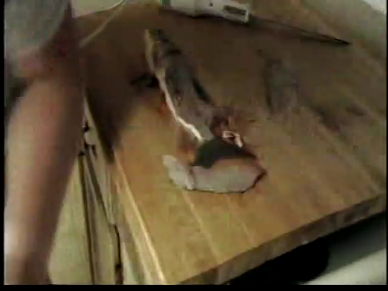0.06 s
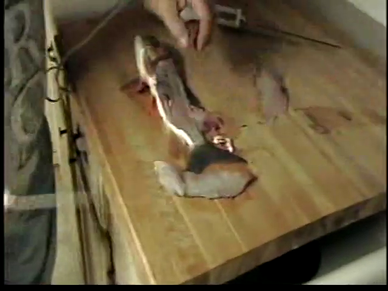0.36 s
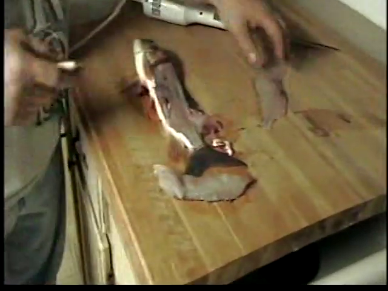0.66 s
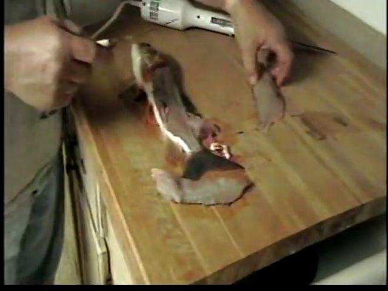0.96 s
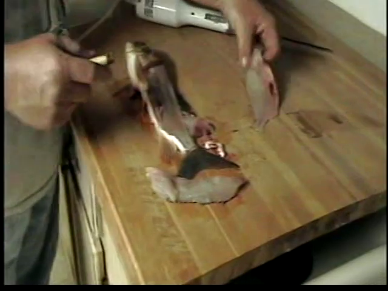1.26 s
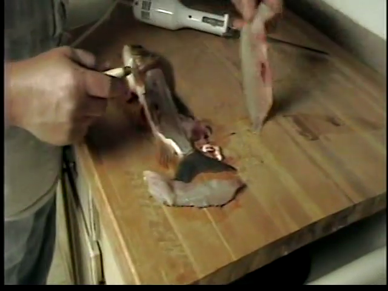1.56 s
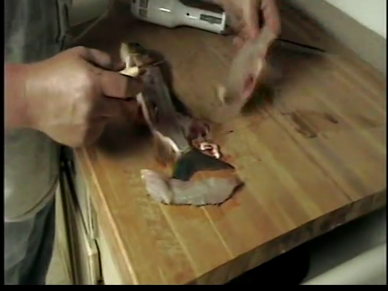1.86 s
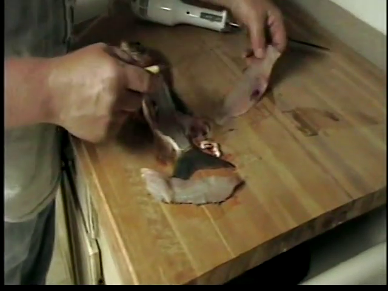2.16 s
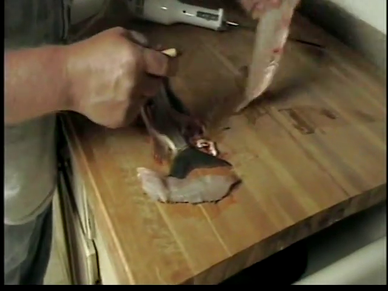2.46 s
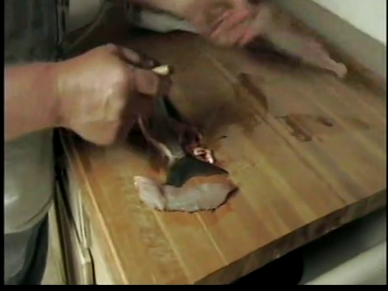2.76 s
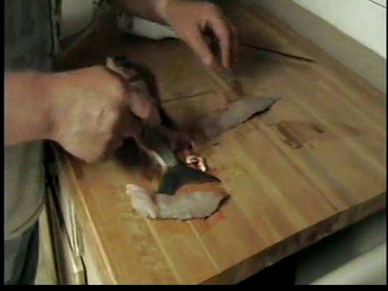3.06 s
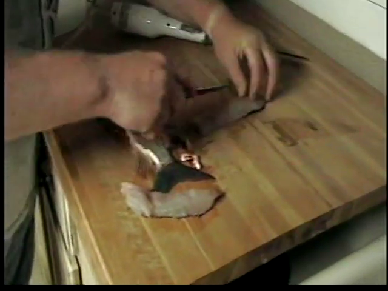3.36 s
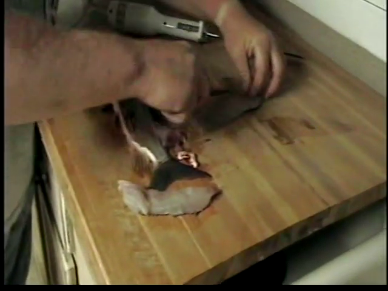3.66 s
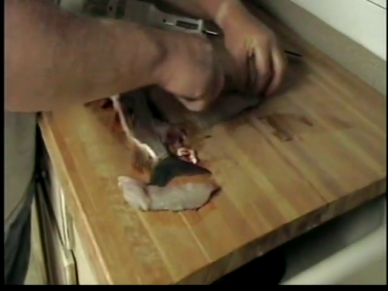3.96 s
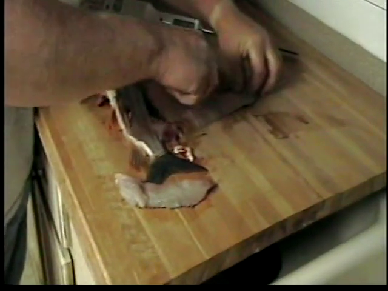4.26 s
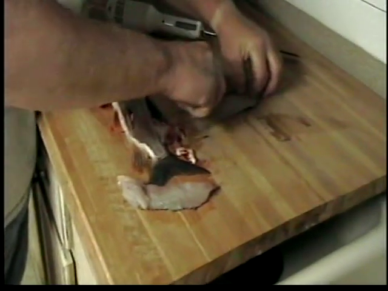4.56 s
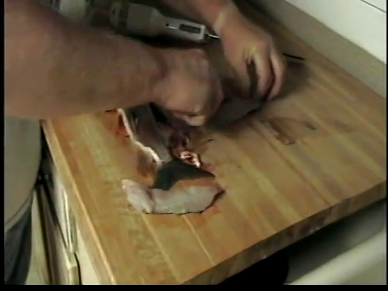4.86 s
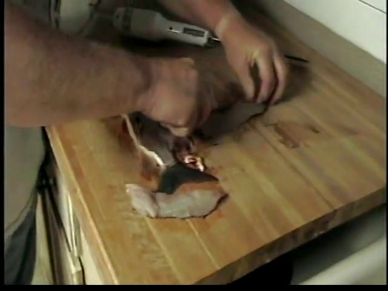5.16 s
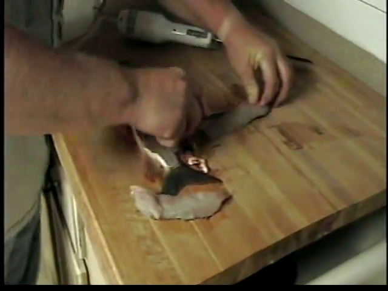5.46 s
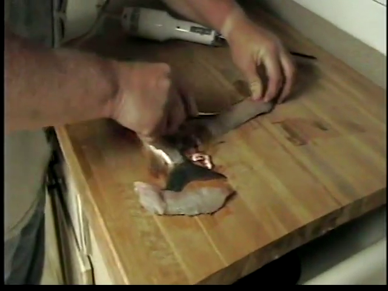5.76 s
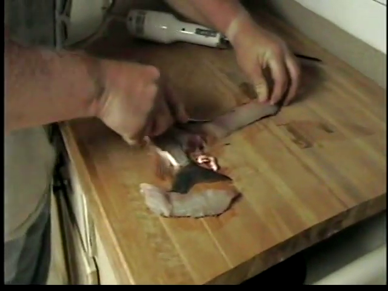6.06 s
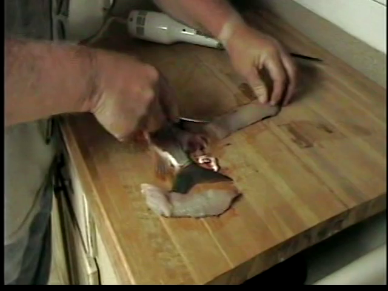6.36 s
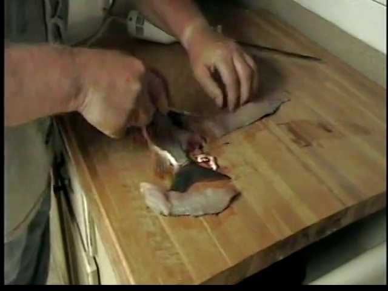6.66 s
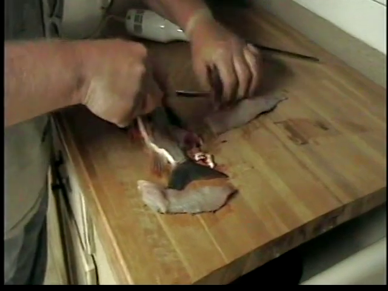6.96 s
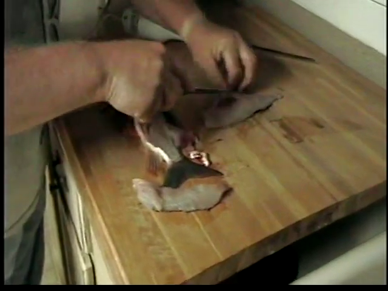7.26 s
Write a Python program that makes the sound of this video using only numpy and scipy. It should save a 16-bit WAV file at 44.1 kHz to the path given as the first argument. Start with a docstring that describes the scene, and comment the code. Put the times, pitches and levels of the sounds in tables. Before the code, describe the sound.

A fish is handled and cut on a wooden board, heard close up in a small room with a steady low appliance hum and soft hiss. In the first 0.4 seconds, wet flesh squelches with quick snaps and little popping air pockets. A sleeve swishes at 0.7 seconds, and a firm, dull knock on the board follows at 0.9, then small wet clicks. From about 1.4 to 1.9 seconds a fillet peels up with a fine, bright, sticky crackle. A wet snap and soft thud come at 2 seconds, then another brief crackle and faint brushing. At 3 seconds a sharp crack and a wet smack on the wood form the loudest moment. After light rustles, a knife saws through rib bones from 4.4 to 6.8 seconds in short, quiet, gritty strokes, with small cracks and muffled bumps. Two soft knocks fall around 7 seconds.

```python
"""A small room, where a fish is filleted on a wooden worktop. Wet flesh squelches and its air pockets pop,
a sleeve swishes by friction, and bones snap in bursts of tiny ruptures. A fillet peels off, thread by
sticky thread, and smacks down, ringing the board's modes. Then the knife saws through the ribs in short,
gritty stick-slip strokes. An appliance hums steadily behind it all, over a soft rumble and hiss."""
import sys
import numpy as np
from scipy import signal
from scipy.fft import rfft, irfft, next_fast_len
from scipy.io import wavfile
from scipy.ndimage import map_coordinates

SR = 44100
rng = np.random.default_rng(int(sys.argv[2]) if len(sys.argv) > 2 else 0)


def transcribe(signal):
    """Save signal, clipped to [-1, 1], as a 16-bit WAV file at the path in sys.argv[1]."""
    frames = np.atleast_2d(signal).T
    limited = np.clip(frames, -1, 1)
    pcm = np.round(limited * 32767).astype(np.int16)
    wavfile.write(sys.argv[1], SR, pcm)


N = 327663

# Spectrum of one grain of tearing tissue. Each row: frequency in Hz, spectral level in dB.
GRIT_SPECTRUM = [(100, -30), (240, -6), (320, 7), (430, -20.5), (800, -0.5), (1400, -7), (2500, -4.5),
                 (3400, -1.5), (4300, -2.5), (5200, -0.5), (6300, -7), (7600, -10.5), (9300, -4.5),
                 (10600, -6.5), (13000, -3), (15800, -15.5)]


def snaps():
    """Fracture: bone and flesh start to give, break, spatter with smaller ruptures and pop an air pocket."""
    # Each row: time in seconds, level in dB, tilt in dB per octave, pocket pitch in Hz.
    fractures = [(.086, -21, 1, 4770), (0.0911, -23.5, -1, 1340), (0.154, -29.5, -9.5, 3920),
                 (.191, -28, 6, 12500), (.288, -29.5, -15.5, 1960), (.339, -28, -7, 3460),
                 (0.3577, -23, -1.5, 3700), (.982, -36.5, -21, 2630), (1.0416, -39, -10, 5600),
                 (1.081, -35.5, -6, 2550), (2.026, -19.5, -2, 2690), (2.0604, -29, 5, 8880),
                 (2.322, -34, 4, 9050), (2.9926, -13.5, -2.5, 3030), (4.429, -30.5, -4.5, 4440),
                 (4.6424, -31, 4.5, 9500), (4.8618, -37.5, 1.5, 9500), (4.9859, -32, -1.5, 4740),
                 (5.0425, -32, -1, 5340), (5.1976, -34.5, -4, 3320), (5.3803, -40, -2, 4000),
                 (6.6, -33.5, -3.5, 4600), (6.7947, -39.5, 3, 9500), (7.1033, -46, -4, 5000)]
    # One rupture. Each row: frequency in Hz, spectral level in dB.
    spectrum = [(150, -17), (600, -8.5), (1400, -2.5), (2200, 0.5), (3000, 0), (4500, 7.5), (6000, 4.5),
                (7400, 0.5), (9500, 3), (12000, 0.5), (15800, 4)]
    break_s, pocket_db = .001, 3
    out, t = np.zeros((2, N)), np.arange(-SR // 200, SR // 20) / SR
    for s, db, tilt_db, pocket_hz in fractures:
        giving = np.exp(np.minimum(t - break_s, 0) / 0.0011)  # the tear accelerates up to the break
        decay = amp(-60 * np.abs(t) / 0.025) + amp(8 - 60 * np.abs(t) / 0.051)
        burst = grains(len(t), rate=17000, spread_db=5.5) * giving * decay
        burst *= 2.69 / np.linalg.norm(burst)
        burst[np.searchsorted(t, break_s)] += 1
        crack = np.convolve(burst, ping(spectrum, tilt_db))[:len(t)]
        pop = amp(pocket_db) * pocket(t, pocket_hz)
        radiate(out, s + t[0], amp(db) * (crack + pop), wet_db=-4.5)
    return out


def knocks():
    """Impact excites the board's modes: soft contact mutes the high ones, hard contact ticks and smacks."""
    # Each row: start in seconds, level in dB, contact cut-off in Hz.
    blows = [(0.9128, -10, 790), (2.027, -24.5, 258), (2.994, -15, 423), (3.033, -10, 2300),
             (4.436, -27, 394.3), (5.003, -27, 400), (6.602, -28.5, 670), (6.978, -28, 348),
             (7.059, -33, 398)]
    # Each row: frequency in Hz, bandwidth in Hz, weight in dB.
    board_modes = [(84, 14, -13), (190, 6.8, -4.5), (225, 15, 2), (316, 8, 9.5), (517, 52, 1.5),
                   (635, 130, -19), (850, 150, 11), (954, 55, 10), (1198, 89, 7), (1670, 340, -25),
                   (2300, 330, -30)]
    # Wet flesh landing flat, and a hard contact. Each row: frequency in Hz, spectral level in dB.
    smack_spectrum = [(300, -30), (650, -23), (860, 6), (1170, 6.5), (1450, -6), (2400, -20), (6000, -32),
                      (15800, -38)]
    tick_spectrum = [(300, -51), (1200, -2), (2000, 10), (3800, 5), (5500, -11), (10000, -4.5),
                     (15800, -41)]
    hard_hz, smack_db = 2325, 1.5
    out, t = np.zeros((2, N)), np.arange(SR // 3) / SR
    for s, db, contact_hz in blows:
        ring = sum(amp(level + rng.normal(0, 1)) * width / (1 + (hz / contact_hz) ** 3) * mode(t, hz, width)
                   for hz, width, level in board_modes)
        radiate(out, s, -amp(db) * unit_energy(ring), wet_db=-1.5)
        tick_db = db + 2.5 + 32 * np.log2(contact_hz / hard_hz)  # softer contacts lose tick and smack
        contact = amp(smack_db) * signal.fftconvolve(spatter(t, t60=0.066), ping(smack_spectrum, tilt_db=-4))
        tick = ping(tick_spectrum, tilt_db=0)
        contact[:len(tick)] -= tick
        radiate(out, s, amp(tick_db) * contact, wet_db=-5)
    return out


def knife_strokes():
    """Stick-slip: the edge catches and tears fibre and bone in clumps of grains that ring the blade."""
    # Each row: time of the peak in seconds, length in seconds, level in dB.
    strokes = [(4.43, 0.061, -45), (4.559, 0.19, -62.5), (4.658, 0.12, -63), (4.789, 0.21, -63.5),
               (5.009, 0.13, -49.5), (5.194, 0.36, -64.5), (5.431, 0.16, -60.5), (5.629, 0.15, -58),
               (5.832, 0.1, -59), (6.034, 0.14, -59), (6.239, 0.13, -56), (6.607, 0.037, -52.5),
               (6.651, 0.12, -62), (6.774, 0.061, -56)]
    # Each row: frequency in Hz, bandwidth in Hz, weight in dB.
    blade_modes = [(3320, 230, -4.5), (5290, 580, 3), (9100, 680, -5.5), (13200, 770, -0.5)]
    out, t = np.zeros((2, N)), np.arange(SR // 50) / SR
    blade = sum(amp(level) * np.sqrt(width) * mode(t, hz, width) for hz, width, level in blade_modes)
    blade = amp(-5.5) * unit_energy(blade)  # relative to the tearing
    for s, length, db in strokes:
        start, force = swell(s, length, rise_share=0.51, shape=1.16)
        n = len(force)
        catching = amp(2.3 * wobble(130)[:n])
        tearing = force * unit_rms(catching * grains(n, rate=5000, spread_db=.5))
        jolts = force * unit_rms(catching * grains(n, rate=1600, spread_db=-1.0))
        grit = signal.fftconvolve(tearing, ping(GRIT_SPECTRUM, tilt_db=-0.5))[:n]
        ring = signal.fftconvolve(jolts, blade)[:n]
        radiate(out, start, amp(db) * (grit + ring), wet_db=-6.5)
    return out


def peels():
    """Adhesive failure: sticky threads part one by one in tiny bright crackles as the fillet lifts."""
    # Each row: time of the peak in seconds, length in seconds, level in dB.
    pulls = [(1.664, 0.56, -35.5), (2.408, 0.079, -29)]
    threads_per_s, thread_hz = 40, 10500
    gap = SR / threads_per_s
    out, t = np.zeros((2, N)), np.arange(SR // 40) / SR
    for s, length, db in pulls:
        start, pull = swell(s, length, rise_share=0.66, shape=1.4)
        crackles = np.zeros(len(pull) + len(t))
        for slot in np.arange(0, len(pull) - gap, gap):
            i = int(slot + gap * rng.random())
            hz = thread_hz * np.exp(.22 * rng.standard_normal())
            thread = signal.fftconvolve(spatter(t, t60=.025), pocket(t, hz, cycles=0.89))[:len(t)]
            crackles[i:i + len(t)] += pull[i] * amp(rng.normal(0, 2)) * thread
        radiate(out, start, amp(db) * crackles, wet_db=-4.5)
    return out


def squelches():
    """Yielding under pressure: flesh gives at once and oozes in fine grains as air pockets pop at random."""
    # Each row: time of the peak in seconds, release in seconds, level in dB, tilt in dB per octave.
    presses = [(.09, 0.15, -44.5, 1.5), (0.306, .13, -47.5, -8), (.36, 0.14, -52.5, -14),
               (1.084, 0.11, -57.5, -5), (1.304, 0.063, -54.5, 0), (2.03, .035, -49, -2.5),
               (2.998, 0.032, -34.5, 3)]
    attack_s = 0.0078
    pops_per_s, pop_hz, pop_db, fade_db = 40, 2616, 19.5, 15
    out = np.zeros((2, N))
    for s, release, db, tilt_db in presses:
        length = attack_s + release
        start, pressure = swell(s, length, rise_share=attack_s / length, shape=.85)
        t = start - s + np.arange(len(pressure)) / SR
        ruptures = pressure * grains(len(t), rate=8300, spread_db=6.0)
        ooze = signal.fftconvolve(ruptures, ping(GRIT_SPECTRUM, tilt_db))[:len(t)]
        for slot in np.arange(0, release, 1 / pops_per_s):
            delay = slot + rng.random() / pops_per_s
            hz = pop_hz * np.exp(0.37 * rng.standard_normal())
            ooze += amp(pop_db - fade_db * delay / release) * pocket(t - min(delay, t[-1] / 2), hz)
        radiate(out, start, amp(db) * ooze, wet_db=-4.0)
    return out


def plops():
    """Lightly damped resonance: larger air pockets open in the flesh and ring more clearly."""
    # Each row: start in seconds, pitch in Hz, level in dB.
    openings = [(.112, 2280, -18), (.132, 2140, -22), (0.158, 1920, -22.5), (.177, 4900, -26),
                (.233, 2750, -25)]
    out, t = np.zeros((2, N)), np.arange(SR // 25) / SR
    for s, hz, db in openings:
        radiate(out, s, amp(db) * pocket(t, hz, cycles=6), wet_db=-2)
    return out


def swishes():
    """Sliding friction: cloth and hands brush along in dense, even grains."""
    # Each row: time of the peak in seconds, length in seconds, level in dB, tilt in dB per octave.
    brushes = [(0, 0.059, -54, 2.5), (0.682, 0.24, -41, 3), (0.832, 0.61, -59, 14), (2.48, .4, -67, 2),
               (2.691, 0.19, -57.5, -4), (2.814, 0.13, -64, 2.5), (3.704, 0.09, -64, 4),
               (3.907, 0.034, -61, 3), (4.083, 0.04, -61, 1), (4.179, 0.022, -56.5, -2)]
    # Each row: frequency in Hz, spectral level in dB.
    cloth_spectrum = [(40, -26), (80, 5), (280, 13.5), (420, 6.5), (750, 15), (1300, 11), (2200, 10.5),
                      (3700, 5), (5100, 1.5), (5900, -6), (7500, -17), (12500, -21), (15800, -30.5)]
    out = np.zeros((2, N))
    for s, length, db, tilt_db in brushes:
        start, speed = swell(s, length, rise_share=0.43, shape=1.65)
        rubbing = speed * grains(len(speed), rate=4500, spread_db=1)
        swish = signal.fftconvolve(rubbing, ping(cloth_spectrum, tilt_db, hinge_hz=1250))
        radiate(out, start, amp(db) * swish, wet_db=-2.0)
    return out


def appliance_hum():
    """Superposed tones: steady mains harmonics, slightly unsteady motor tones and a drone that fades."""
    # Each row: multiple of the mains frequency, level in dB.
    harmonics = [(1, -59), (2, -64), (3, -71.5), (4, -76.5)]
    # Each row: frequency in Hz, level in dB.
    motor_tones = [(43.5, -76), (52, -84), (100.7, -63), (130.5, -81), (156, -71.5), (201, -74.5),
                   (730, -92), (1096, -76.5), (1460, -83.5), (2192, -77)]
    # Each row: time in seconds, frequency in Hz, level in dB.
    drone_path = [(0, 290, -68), (.5, 285.5, -68.5), (.95, 268.4, -67), (1.301, 271.7, -67),
                  (1.7, 284, -66), (2.1, 289, -67.5), (2.35, 290, -104)]
    mains_hz, t = 60, np.arange(N) / SR
    mains = sum(amp(db) * np.sin(2 * np.pi * (round(k) * mains_hz * t + rng.random())) for k, db in harmonics)
    motor = np.zeros(N)
    for hz, db in motor_tones:
        gain = amp(db + 0.96 * wobble(1.33))
        motor += gain * np.sin(2 * np.pi * (hz * t + rng.random()) + 0.66 * wobble(2.62))
    s, hz, db = np.transpose(drone_path)
    drone = amp(np.interp(t, s, db)) * np.sin(2 * np.pi * np.cumsum(np.interp(t, s, hz)) / SR)
    return np.sqrt(2) * (mains + motor + drone)


def room_air():
    """Partly coherent ambient noise: a soft, even hiss and a low rumble whose level drifts."""
    # Each row: frequency in Hz, spectral level in dB.
    hiss_spectrum = [(82, -46), (140, -3), (220, -7), (296, -6), (504, -9.5), (718, -9.5), (1020, -14),
                     (1110, -14.5), (1610, -16.5), (2250, -17.5), (2430, -19.5), (3680, -22), (15500, -29)]
    rumble_spectrum = [(15, -36), (30, -12.5), (55, -6.5), (85, -12), (120, -15.5), (170, -26), (300, -27),
                       (900, -120)]
    # Each row: frequency in Hz, left-right correlation.
    coherence = [(60, 0.87), (130, 0.39), (290, 0.42), (640, 0.71), (1400, 0.55), (3100, 0.38), (6800, 0),
                 (15000, 0.018)]

    def bed(spectrum):
        noise = pair(rng.standard_normal((2, N)), coherence)
        return unit_rms(filtered(noise, lambda hz: amp(along(spectrum, hz))))

    hiss = amp(-60) * bed(hiss_spectrum)
    rumble = amp(-60 + 2 * wobble(2)) * bed(rumble_spectrum)
    return hiss + rumble


def radiate(out, s, x, wet_db, lag_s=.000021):
    """Direct sound plus reverberation: add x to out at s seconds, its direct path later on the left."""
    # Each row: frequency in Hz, reverberation time in seconds.
    decay_times = [(100, 0.38), (300, 0.44), (900, 0.22), (2500, 0.25), (6000, 0.25), (15000, 0.19)]
    hz, t, spectra = signal.stft(rng.standard_normal((2, SR // 4)), SR, nperseg=256)
    tail = signal.istft(spectra * amp(-60 * t / along(decay_times, hz)[:, None]), SR, nperseg=256)[1]
    tail = pair(tail, [(200, 0.98), (2000, 1.0), (4500, 0.77), (8000, 0.0), (15000, 0)])
    tail *= 1 - np.exp(-np.arange(tail.shape[1]) / SR / 0.00083)  # reflections build up
    response = amp(wet_db) * np.sqrt(2) * unit_energy(tail)
    taps = np.arange(-8, 9)
    response[:, :len(taps)] += np.sinc(taps - np.array([[.5], [-.5]]) * lag_s * SR) * np.hanning(len(taps))
    heard = signal.fftconvolve(x[None], response, axes=1)
    start = round(s * SR) + taps[0]
    heard = heard[:, max(-start, 0):N - start]
    out[:, max(start, 0):][:, :heard.shape[1]] += heard


def pocket(t, hz, cycles=2.5, rise_per_s=2.8):
    """Cavity resonance: trapped air rings from t = 0 and rises in pitch as its pocket opens; energy 1."""
    t = np.maximum(t, 0)
    tone = np.sin(2 * np.pi * hz * t * (1 + rise_per_s * t / 2))
    return unit_energy(tone * np.exp(-hz * t / cycles) * (1 - np.exp(-hz * t)))


def mode(t, hz, width_hz):
    """Free vibration of a damped mode: the wider its band, the faster it decays."""
    return np.exp(-np.pi * width_hz * t) * np.sin(2 * np.pi * hz * t)


def grains(n, rate, spread_db):
    """Shot noise: n samples of tiny ruptures of uneven size, rate a second; rms 1."""
    size = rng.standard_normal(n) * amp(spread_db * np.minimum(rng.exponential(size=n), 4))
    return unit_rms(size * (rng.random(n) < rate / SR))


def spatter(t, t60):
    """Decaying shot noise: a burst of ruptures that falls 60 dB in t60 seconds; energy 1."""
    return unit_energy(grains(len(t), rate=12000, spread_db=-8.5) * amp(-60 * t / t60))


def swell(s, length, rise_share, shape):
    """A gesture's envelope, peaking at s and 20 dB down at both ends of its length: start and gains."""
    t = np.arange(-SR // 3, SR // 3) / SR
    share = np.where(t < 0, rise_share, 1 - rise_share)
    return s + t[0], amp(-20 * np.abs(t / length / share) ** shape)


def ping(spectrum, tilt_db, hinge_hz=2500, size=1024):
    """Minimum-phase impulse with this spectrum, tilted by dB per octave above the hinge; energy 1."""
    hz = np.fft.rfftfreq(size, 1 / SR)
    db = along(spectrum, hz) + tilt_db * np.log2(np.maximum(hz, hinge_hz) / SR)
    cepstrum = irfft(np.log(amp(db)))
    cepstrum[1:size // 2] *= 2
    cepstrum[size // 2 + 1:] = 0
    return unit_energy(irfft(np.exp(rfft(cepstrum))))


def pair(noise, coherence):
    """Mid-side mixing: two unrelated signals become left and right with these (Hz, correlation) points."""
    angle = lambda hz: np.arccos(np.clip(along(coherence, hz), -1, 1)) / 2
    mid, side = filtered(noise, lambda hz: np.array([np.cos(angle(hz)), np.sin(angle(hz))]))
    return np.array([mid + side, mid - side])


def filtered(x, response):
    """Linear filtering: the spectrum of x times a function of frequency."""
    n = x.shape[-1]
    padded = next_fast_len(n + 4096, True)
    return irfft(rfft(x, padded) * response(np.fft.rfftfreq(padded, 1 / SR)), padded)[..., :n]


def wobble(rate):
    """A smooth random curve, rate knots a second."""
    knots = rng.standard_normal(int(N * rate / SR) + 4)
    return map_coordinates(knots, [np.arange(0, N + 64, 64) * rate / SR]).repeat(64)[:N]


def along(points, hz):
    """Interpolate (Hz, value) points on a log axis."""
    frequencies, values = np.transpose(points)
    return np.interp(np.log(hz + 1), np.log(frequencies + 1), values)


def amp(db):
    """Decibels to gain."""
    return 10 ** (np.asarray(db) / 20)


def unit_rms(x):
    """Scale to rms 1."""
    return x / np.sqrt(np.mean(x ** 2) + 1e-20)


def unit_energy(x):
    """Scale to energy 1."""
    return x / np.linalg.norm(x)


def scene():
    """Superposition: the work on the board, its treble leaning left or right, over hum and room noise."""
    work = snaps() + plops() + squelches() + peels() + knocks() + knife_strokes() + swishes()
    # Each row: frequency in Hz, left minus right level in dB.
    lean = [(2500, 0), (5500, 3.5), (7500, -0.5), (10000, -4), (15000, -3.0)]
    work = filtered(work, lambda hz: amp(along(lean, hz) * np.array([[.5], [-.5]])))
    return work + appliance_hum() + room_air()


def record(dry):
    """Band limiting: an ideal low-pass removes the highest treble."""
    return filtered(dry, lambda hz: hz < 15850)


dry = scene()
out = record(dry)
transcribe(out)
```